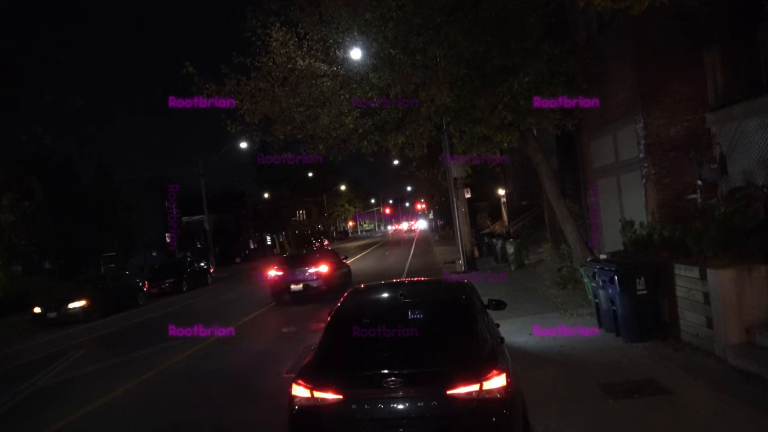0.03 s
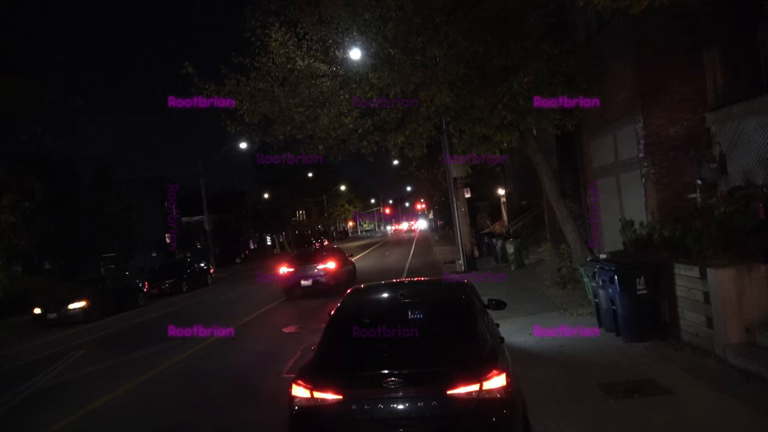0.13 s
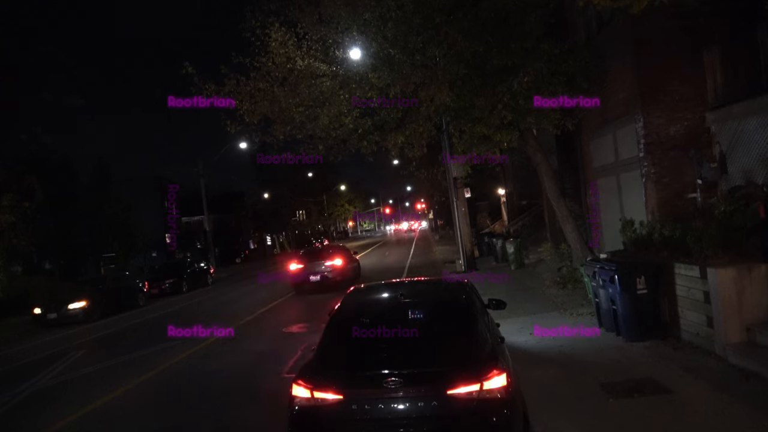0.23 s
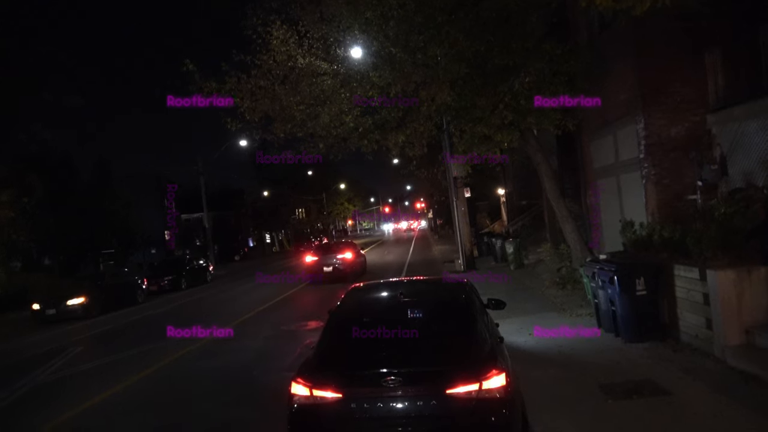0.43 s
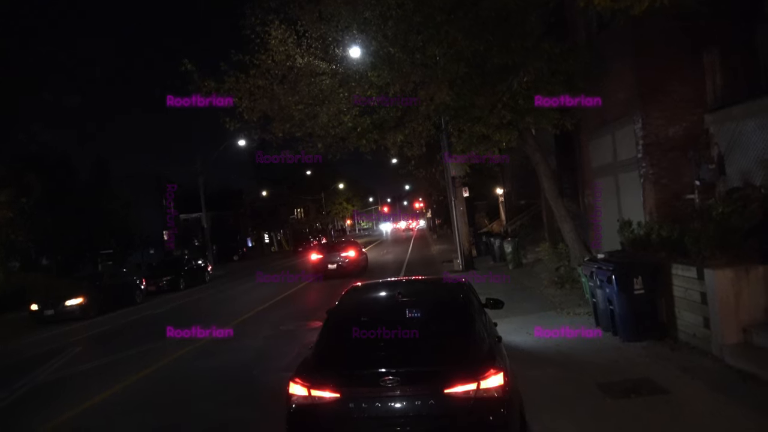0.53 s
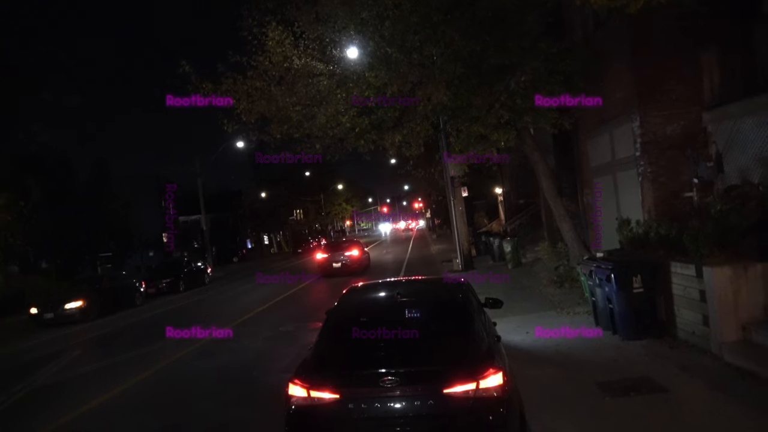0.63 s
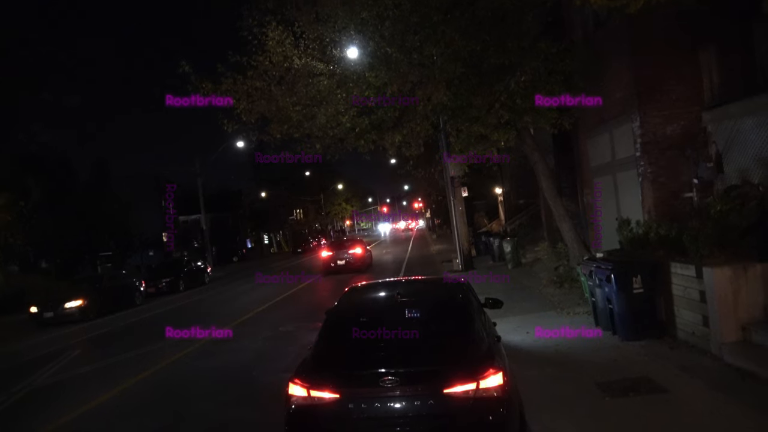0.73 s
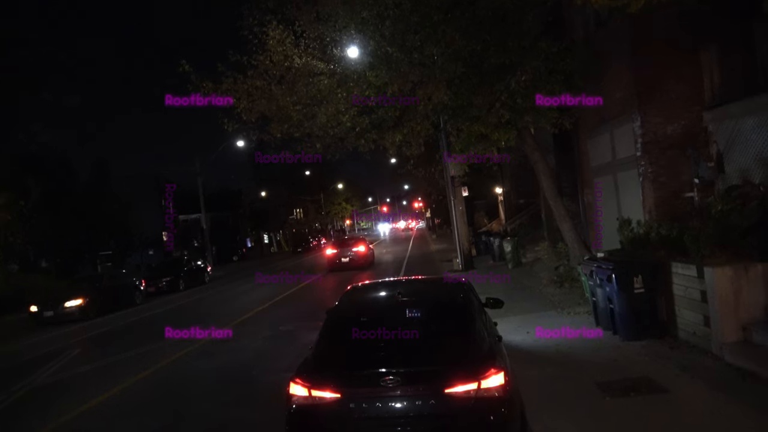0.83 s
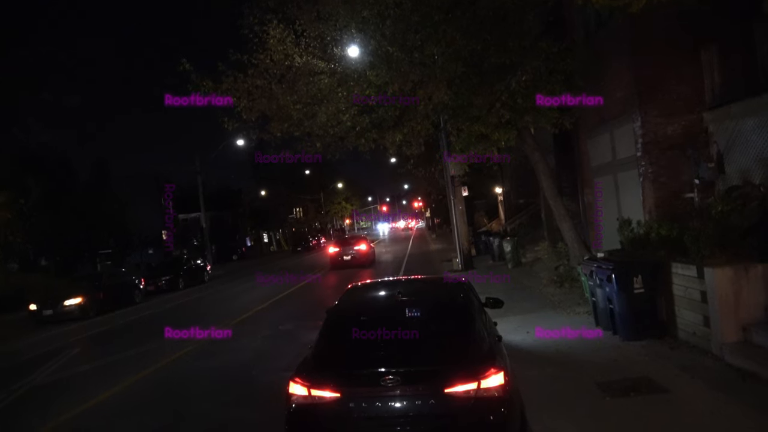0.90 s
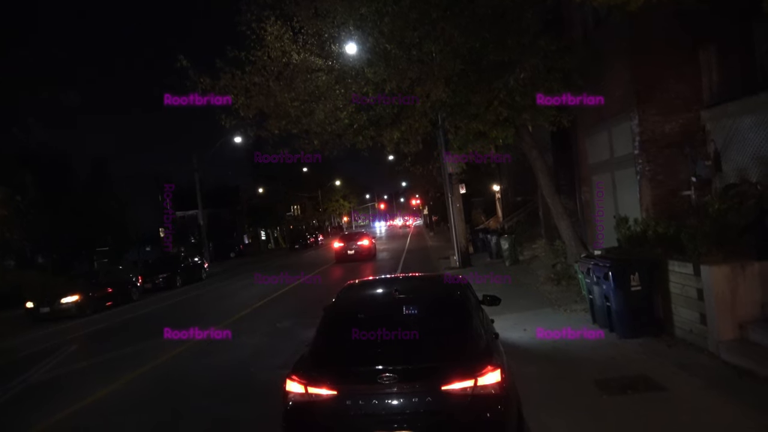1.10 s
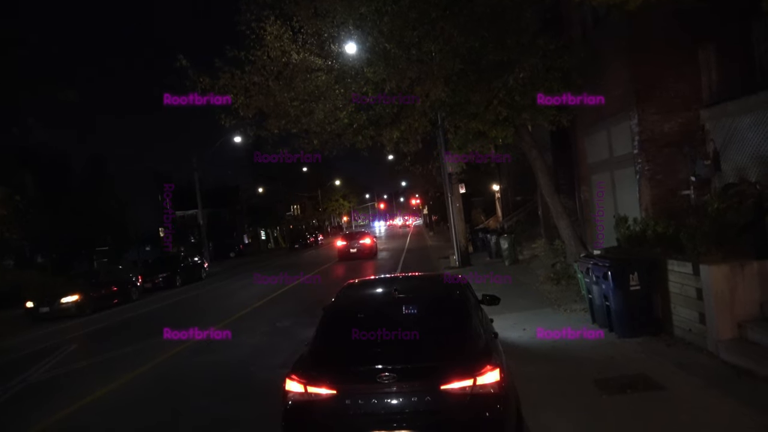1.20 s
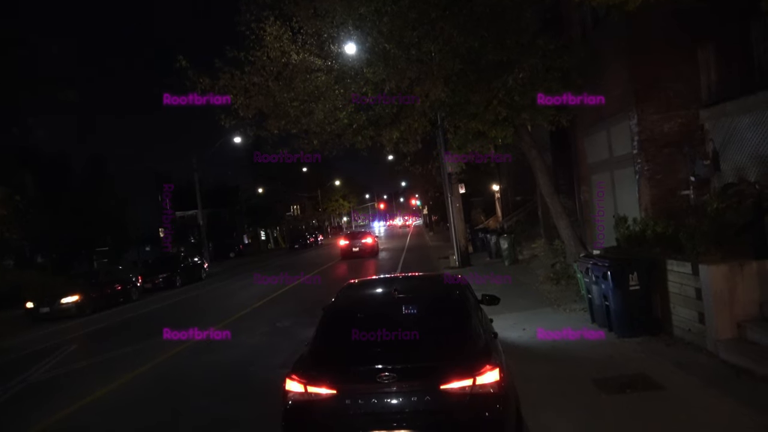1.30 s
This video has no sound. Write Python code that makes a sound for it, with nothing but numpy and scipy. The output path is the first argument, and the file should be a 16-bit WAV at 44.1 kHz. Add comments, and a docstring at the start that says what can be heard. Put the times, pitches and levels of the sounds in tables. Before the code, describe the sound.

Two short air horn blasts merge into one ringing blare above faint traffic rumble.

```python
"""On a night street, an air horn gives two quick toots, each just after a spit of air from its valve.
Air shakes the horn's diaphragm, making a stack of partials (tones at multiples of one pitch).
House fronts throw the toots back brighter and rougher, so they merge into one blare with a ringing tail.
Underneath are an idling engine and traffic, which sounds much quieter once the horn has started."""
import sys
import numpy as np
from scipy import signal
from scipy.fft import rfft, irfft, next_fast_len
from scipy.io import wavfile
from scipy.ndimage import uniform_filter1d, map_coordinates

SR = 44100
rng = np.random.default_rng(int(sys.argv[2]) if len(sys.argv) > 2 else 0)


def generate_wav(sig):
    """Save sig (samples, or channels by samples) to the path in sys.argv[1] as 16-bit PCM at SR."""
    pcm = np.round(np.clip(np.atleast_2d(sig).T, -1, 1) * 32767).astype(np.int16)
    wavfile.write(sys.argv[1], SR, pcm)


N = 59535


def amp(db):
    """Turn decibels into a number to multiply by."""
    return 10 ** (np.asarray(db) / 20)


def unit(x):
    """Scale a sound to an average power of 1."""
    return x / np.sqrt(np.mean(np.abs(x) ** 2) + 1e-20)


def clock():
    """The time in seconds at each sample."""
    return np.arange(N) / SR


def along(points, hz):
    """Read between the rows of a frequency table, with octaves evenly spaced."""
    freqs, values = np.transpose(points)
    return np.interp(np.log(hz + 1), np.log(freqs + 1), values)


def curves(rows):
    """Join the rows of a time table with straight lines, one curve per value column."""
    times, *columns = np.transpose(rows)
    return [np.interp(clock(), times, column) for column in columns]


def wobble(rate):
    """A smooth curve through `rate` random values a second."""
    return map_coordinates(rng.standard_normal(256), [clock() * rate], mode="wrap")


def filtered(x, response):
    """Turn each frequency in x up or down by the gain that `response` gives."""
    size = next_fast_len(N + SR // 2)
    return irfft(rfft(x, size) * response(np.fft.rfftfreq(size, 1 / SR)), size)[..., :N]


def panned(balance_db):
    """Left and right gains that average 1; a positive balance leans left."""
    gains = amp(np.array([np.atleast_1d(balance_db), -np.atleast_1d(balance_db)]) / 2)
    return gains / gains.mean(axis=0)


# How alike noise is in the two ears. Each row: frequency in Hz, likeness (1 is identical).
EAR_LIKENESS = [(30, .99), (120, 0.57), (300, 0.98), (5000, 1), (12000, 0.5)]
def noise(spectrum):
    """Stereo noise with the given tone colour and an average power of 1."""
    def response(hz):
        width = np.arccos(np.clip(along(EAR_LIKENESS, hz), -1, 1)) / 2
        return amp(along(spectrum, hz)) * [np.cos(width), np.sin(width)]
    mid, side = filtered(rng.standard_normal((2, N)), response)
    return unit(np.array([mid + side, mid - side]))


# How loud the traffic is. Each row: time in seconds, rumble in dB, tyre noise in dB.
TRAFFIC_LEVELS = [(0, -29, -27), (.205, -27, -27), (.25, -45, -42), (.315, -46, -42), (.385, -33, -36),
                  (.445, -36, -38), (.48, -49, -50), (.57, -49, -50), (.63, -43, -42), (1.0, -42, -38),
                  (1.35, -40, -41)]
# The tone colours of rumble and tyres. Each row: frequency in Hz, relative level in dB.
RUMBLE_COLOUR = [(15, -17.5), (30, -1), (42, 0), (260, 5), (340, -0.5), (500, -0.5), (900, -77.5)]
TYRE_COLOUR = [(150, -41.5), (500, -8), (800, -5.5), (1200, -0.5), (1500, -5), (1900, -12), (3000, -19),
               (4500, -29), (8500, -37), (15000, -53.5)]
# The engine's hum. Each row: multiple of the firing rate, level in dB as the scene ends.
ENGINE_TONES = [(1, -58.5), (2, -47.5), (4, -53)]
# Where rumble and hum sit. Each row: frequency in Hz, left minus right in dB.
RUMBLE_BALANCE = [(30, -1), (80, 0.5), (140, 10), (260, 1)]
def traffic(firing_hz=63.44):
    """The road rumbles, tyres hiss and an idling engine fires a little unevenly."""
    rumble_db, tyres_db = curves(TRAFFIC_LEVELS)
    phase = 2 * np.pi * np.cumsum(firing_hz * (1 + 0.0095 * wobble(39))) / SR
    idle = np.zeros(N)
    for multiple, db in ENGINE_TONES:
        level = np.sqrt(2) * amp(db + 1.3 * wobble(14))
        idle += level * np.sin(round(multiple) * phase + rng.uniform(0, 2 * np.pi))
    idle *= amp(np.minimum(rumble_db - rumble_db[-1], 2))  # the hum dips with the rumble
    low = amp(rumble_db) * noise(RUMBLE_COLOUR) + idle
    low = filtered(low, lambda hz: panned(along(RUMBLE_BALANCE, hz)))
    return low + amp(tyres_db) * noise(TYRE_COLOUR)


# How long the street rings. Each row: frequency in Hz, seconds to fade by 60 dB.
RING_TIMES = [(300, 0.33), (1500, 0.41), (4000, 1), (12000, 0.095)]
def street_echo(sound, level_db=-21.5):
    """Sound bounces between the houses and blurs into a tail that rings longest near 4000 Hz."""
    hz, t, spectrum = signal.stft(rng.standard_normal((2, SR)), SR, nperseg=256)
    fade = amp(-60 * t / along(RING_TIMES, hz)[:, None])
    tail = signal.istft(spectrum * fade, SR, nperseg=256)[1]
    return amp(level_db) * signal.fftconvolve(sound, tail / np.linalg.norm(tail[0]), axes=1)[:, :N]


# The two toots. Each row: start in seconds, length in seconds, level of the spit before it in dB.
TOOTS = [(.213, 0.085, -42.5), (0.453, 0.135, -54)]
# The spit's tone colour. Each row: frequency in Hz, relative level in dB.
SPIT_COLOUR = [(2000, -10), (5000, 1), (8500, 1.5), (11000, -3.5), (14000, -8), (15700, -9)]
ATTACK_S, BITE_LAG_S = 0.003, 0.011  # the horn's quickest rise; the wait for partials 3 and up
def valve_spit(rise_s=0.066, flutter_db=2):
    """Air hisses from the valve, swelling until the horn speaks."""
    t = clock()
    opening = np.zeros(N)
    for start, _, db in TOOTS:
        end = start + BITE_LAG_S / 2
        swell = np.clip(1 + (t - end) / rise_s, 0, 1)
        opening += amp(db) * swell * np.clip((end - t) / ATTACK_S, 0, 1)
    return amp(flutter_db * wobble(240)) * opening * noise(SPIT_COLOUR)


def crackle(level_db=-36, thinning_s=0.04):
    """Faint ticks that thin out after the start of each toot."""
    t = clock()
    bursts = sum((t > start + BITE_LAG_S) * np.exp(-np.abs(t - start) / thinning_s) for start, *_ in TOOTS)
    ticks_per_s = 140 * bursts
    return amp(level_db) * (rng.random(N) < ticks_per_s / SR) * rng.choice([-1, 1], N)


# The tone colour of the noise band that follows the tone. Each row: frequency in Hz, relative level in dB.
NOISE_BAND_COLOUR = [(300, -16), (700, -4), (1500, 0), (2600, -12), (4000, -21), (6000, -28), (15000, -39)]
def noise_band(tone, roughness, relative_db=-32):
    """A faint noise band follows the tone's loudness, a touch louder where the horn is rough."""
    loudness = np.sqrt(np.abs(uniform_filter1d(tone.mean(axis=0) ** 2, SR // 100)))
    return amp(relative_db + 0.5 * roughness) * loudness * noise(NOISE_BAND_COLOUR)


# How rough the partials get. Each row: frequency in Hz, number to multiply the roughness by.
ROUGH_FACTORS = [(650, 0.34), (1300, 0.57), (1960, 2.42), (2600, 1.42), (3300, 0.99), (5200, 2.3),
                 (8000, 1.2), (13000, 0.8)]
def echo_flutter(hz, roughness, slow_hz=3.2, fast_hz=45.6, width=0.17):
    """Many reflections add up, shaking one partial's size and phase but keeping its average power."""
    def rates(f):
        return f / np.hypot(f, slow_hz) / (1 + (f / fast_hz) ** 2)
    real, imaginary = filtered(rng.standard_normal((2, 2, N)), rates)
    mid, side = unit(real + 1j * imaginary)
    flutter = np.array([mid + width * side, mid - width * side])
    depth = roughness * along(ROUGH_FACTORS, hz)
    return (1 + depth * flutter) / np.sqrt(1 + depth ** 2)


def handovers(slip_rad=0.8, change_s=0.008):
    """Direct sound (1 in a toot, 0 outside) and echo take turns; the phase slips at each swap."""
    def step(at):
        return np.tanh((clock() - at) / change_s) / 2
    direct = sum(step(start) - step(start + length) for start, length, _ in TOOTS)
    swaps = [edge for start, length, _ in TOOTS for edge in (start, start + length)][1:]
    slip = slip_rad * sum(step(at) for at in swaps)
    tail_s = np.maximum(clock() - swaps[-1], 0)  # time since the last toot ended
    return direct, slip, tail_s


HORN_HZ = 652.8
def diaphragm_phase(sharp_hz=27, settle_s=0.021, sag_hz=3.45):
    """The diaphragm starts sharp and settles; the note sags a little before the second toot."""
    t = clock()
    overshoot = sharp_hz * np.exp(-((t - TOOTS[0][0]) / settle_s) ** 4)
    sag = sag_hz * np.exp(-((t - 0.409) / 0.091) ** 2)
    return 2 * np.pi * np.cumsum(HORN_HZ + overshoot - sag) / SR


# How loud the five lowest partials are, echoes included. Each row: time in seconds, level in dB.
PARTIAL_1 = [(.21, -19), (.221, -16), (.228, -7.5), (.243, -17.5), (.28, -19), (.305, -14), (.345, -16.5),
             (.368, -23), (.405, -16.5), (.442, -22), (.459, -10.5), (.48, -17), (.555, -17), (.59, -12.5),
             (.625, -15), (.655, -21), (.69, -19), (.73, -24.5), (.76, -37), (.93, -32), (.96, -42),
             (1.12, -41), (1.25, -53)]
PARTIAL_2 = [(.21, -20), (.23, -17), (.24, -9.5), (.288, -8.5), (.325, -18), (.40, -19), (.444, -13),
             (.454, -29), (.463, -16), (.478, -11.5), (.575, -10), (.62, -19), (.65, -25), (.70, -14.5),
             (.73, -16), (.76, -31), (.815, -34), (.85, -24), (.88, -22.5), (.92, -32), (1.0, -44),
             (1.19, -41), (1.3, -52)]
PARTIAL_3 = [(0.23, -23), (0.264, -33.5), (0.312, -33.5), (0.328, -23), (0.4, -31), (0.504, -31.5),
             (0.536, -26), (0.628, -26.5), (0.644, -28.5), (0.688, -23), (0.722, -33), (1.15, -56)]
PARTIAL_4 = [(.23, -30), (.268, -25), (.30, -34), (.394, -19), (.425, -33), (.47, -39), (.54, -31),
             (.59, -37), (.618, -19.5), (.742, -38), (.765, -30.5), (.88, -44), (.93, -40.5), (1.10, -56),
             (1.15, -47), (1.23, -64)]
PARTIAL_5 = [(.23, -32), (.27, -31), (.315, -42), (.355, -22.5), (.39, -24.5), (.42, -35), (.51, -46),
             (.555, -44), (.61, -29), (.675, -26.5), (.70, -42), (.72, -35), (.78, -31.5), (.825, -45),
             (.88, -38), (.935, -62), (.97, -54), (1.09, -47.5), (1.22, -67)]
# Base levels higher up. Each row: time in seconds, dB for partials 6 to 10, dB for the rest.
HIGH_PARTIALS = [(.23, -45, -57), (.27, -38, -43), (.31, -35, -45), (.338, -26.5, -37), (.37, -32, -45),
                 (.40, -33.5, -46), (.465, -43, -58), (.505, -39, -45), (.548, -46, -42.5), (.58, -35, -42),
                 (.625, -28, -39), (.655, -33.5, -45), (.71, -40.5, -52), (.78, -40.5, -54),
                 (.83, -51, -66), (1.25, -70, -95)]
# The tone colour of those high partials. Each row: frequency in Hz, dB added to the base level.
HIGH_COLOUR = [(3910, -6), (5220, -7.3), (6520, -15.5), (7830, -12), (9130, -16.5), (11700, -28),
               (12400, -22), (13700, -37), (15000, -43)]
# Where the horn sits. Each row: time in seconds, left minus right in dB for partial 1, then for 2.
HORN_BALANCE = [(0.22, 1, 1.5), (0.282, 0.5, -0.5), (0.368, -8, -7), (0.462, 1, -6), (0.562, -0.5, 0),
                (0.65, -7.5, -5.5), (0.74, -0.5, -17.5), (0.82, -5, -21), (1.0, -8.5, 2)]
# The rasp where starts and stops echo. Each row: time in seconds, roughness (0 is clean).
ROUGHNESS = [(.225, .5), (.25, .13), (.28, .13), (.325, .52), (.46, .5), (.488, .06), (.565, .06),
             (.588, .55), (.64, .32), (.68, .18), (1.1, .25)]
def horn(roughness, count=23, wobbles_per_s=20):
    """A diaphragm's stack of partials: clean when heard directly, rough and drifting among the echoes."""
    since_start = clock() - TOOTS[0][0]
    phase = diaphragm_phase()
    direct, slip, tail_s = handovers()
    tables = (PARTIAL_1, PARTIAL_2, PARTIAL_3, PARTIAL_4, PARTIAL_5, HIGH_PARTIALS)
    levels = [curve for rows in tables for curve in curves(rows)]
    balances = curves(HORN_BALANCE)
    out = np.zeros((2, N))
    for k in range(1, count + 1):
        hz, low, high = k * HORN_HZ, k <= 2, k > 5
        level_db = levels[np.searchsorted([1, 2, 3, 4, 5, 10], k)]
        if high:
            flicker_db = 3 * wobble(wobbles_per_s) * (1 - direct / 2)
            dulling_db = 75 * tail_s * max(2 * k / count - 1, 0)  # the top dies first in the echoes
            level_db = level_db + along(HIGH_COLOUR, hz) + flicker_db - dulling_db
        balance_db = balances[k - 1] if low else 1.3 * wobble(wobbles_per_s) * (2 - direct)
        drift = rng.uniform(0, 2 * np.pi) + (1 - direct) * 0.7 * wobble(wobbles_per_s)
        drift -= (-1) ** k * min(k, 2) * slip  # odd partials flick up, even ones down
        tone = np.exp(1j * (k * phase + drift)) * echo_flutter(hz, roughness)
        wait_s = 0 if low else BITE_LAG_S
        rise_s = ATTACK_S * (k if high else 1)
        onset = np.clip((since_start - wait_s) / rise_s, 0, 1)
        out += np.sqrt(2) * tone.real * amp(level_db) * panned(balance_db) * onset
    return out


def scene():
    """The horn with its echo, spit, noise band and crackle, over the traffic."""
    roughness, = curves(ROUGHNESS)
    tone = horn(roughness)
    return tone + street_echo(tone) + valve_spit() + noise_band(tone, roughness) + traffic() + crackle()


def record(dry):
    """Cut away everything above 15700 Hz."""
    return filtered(dry, lambda hz: hz < 15700)


dry = scene()
out = record(dry)
generate_wav(out)
```